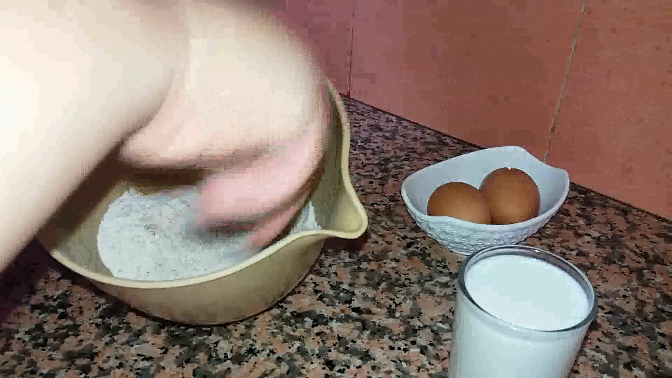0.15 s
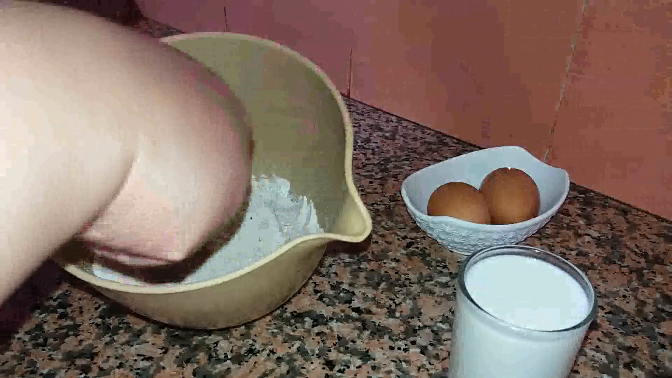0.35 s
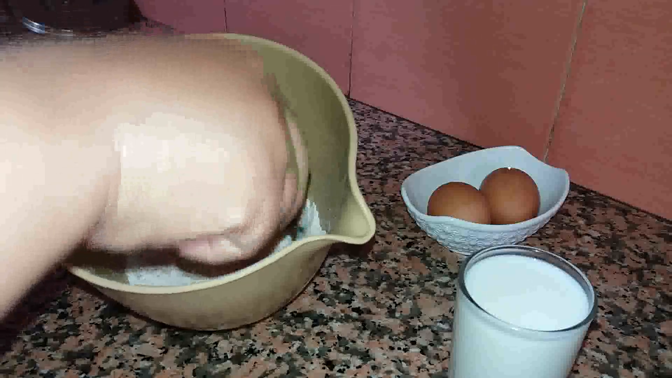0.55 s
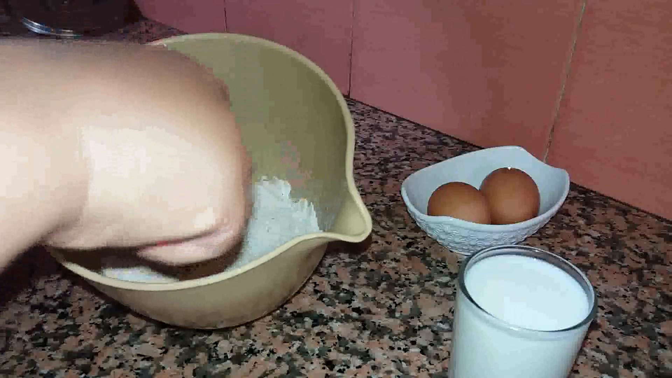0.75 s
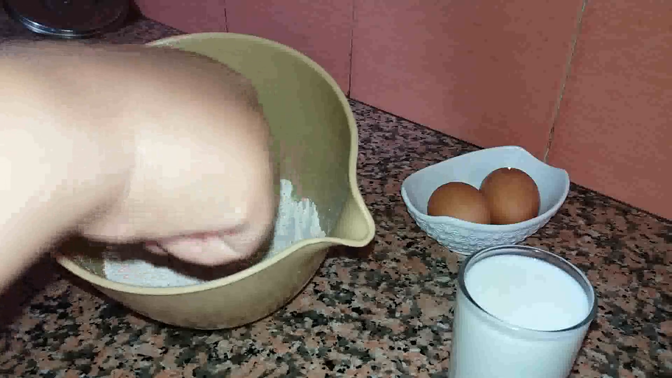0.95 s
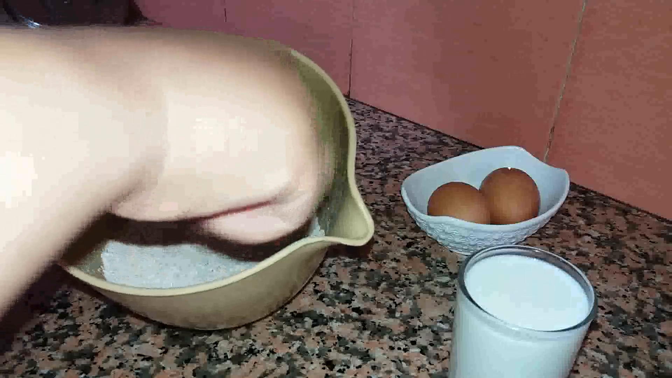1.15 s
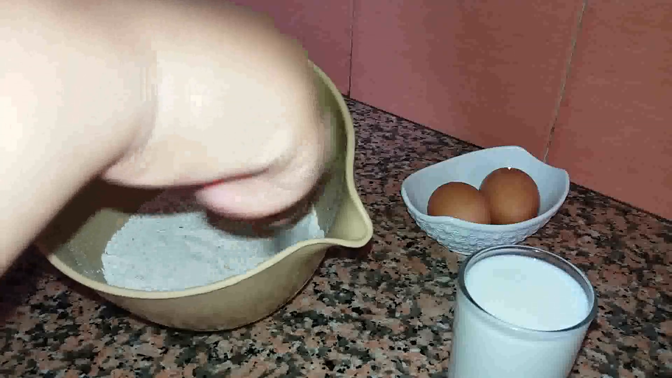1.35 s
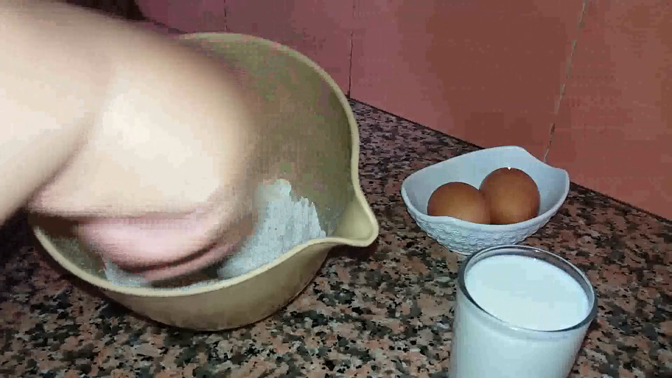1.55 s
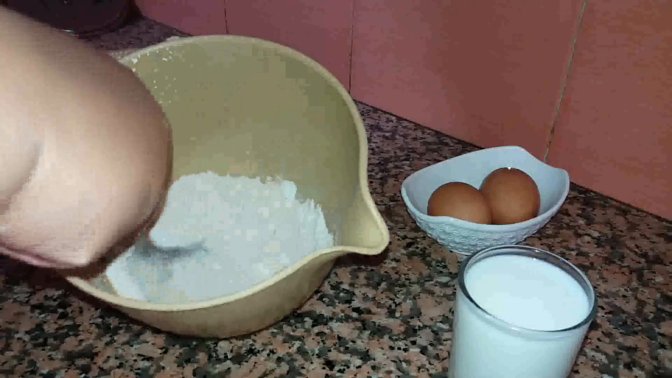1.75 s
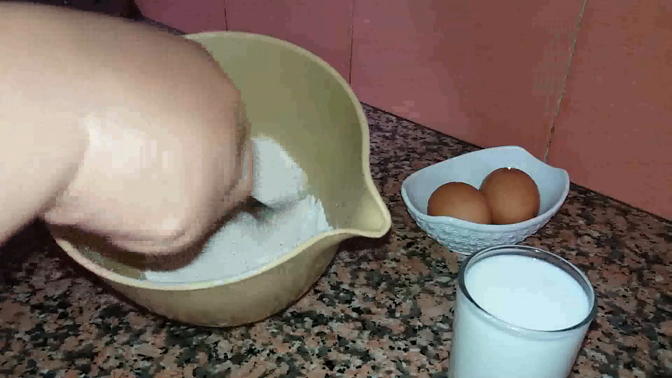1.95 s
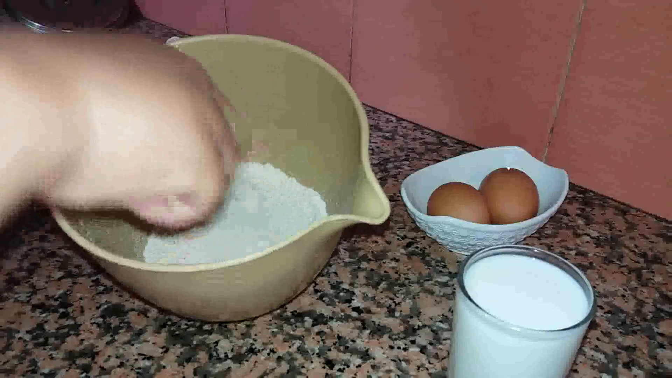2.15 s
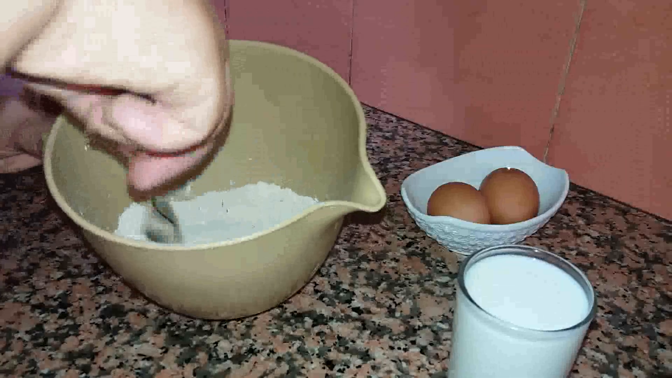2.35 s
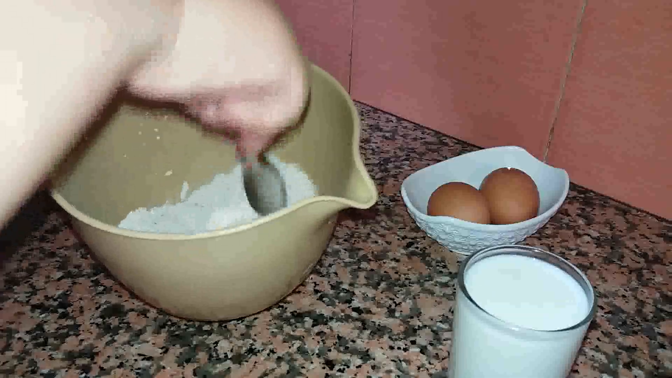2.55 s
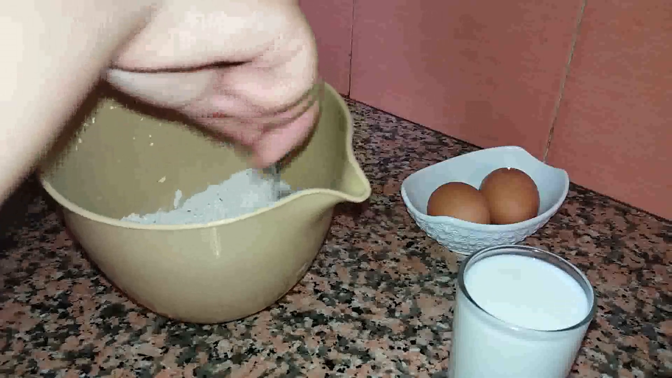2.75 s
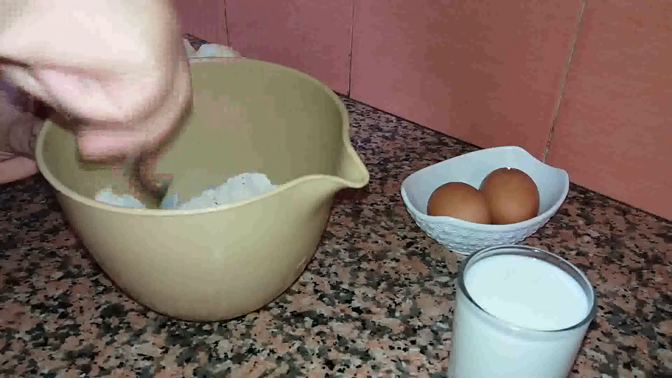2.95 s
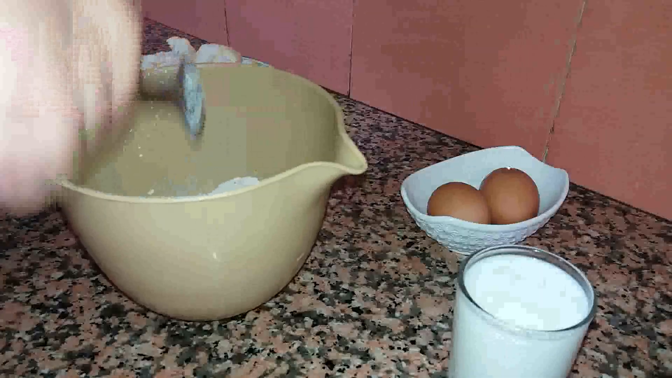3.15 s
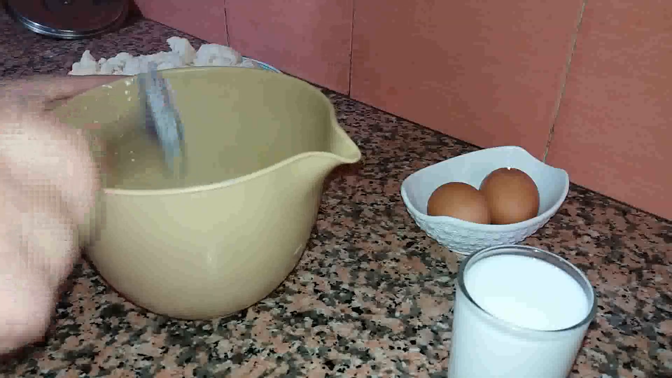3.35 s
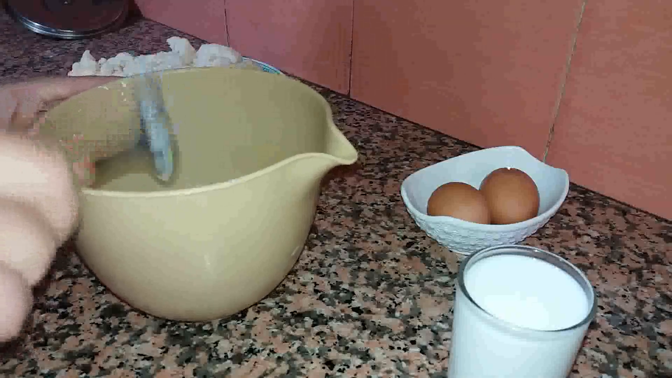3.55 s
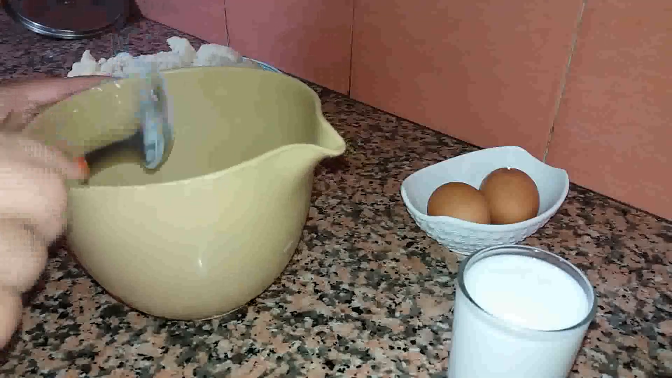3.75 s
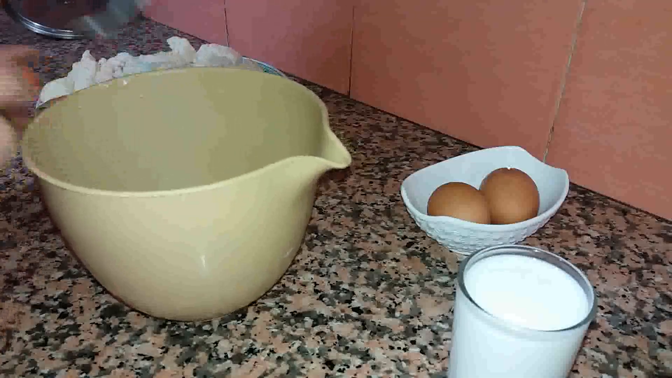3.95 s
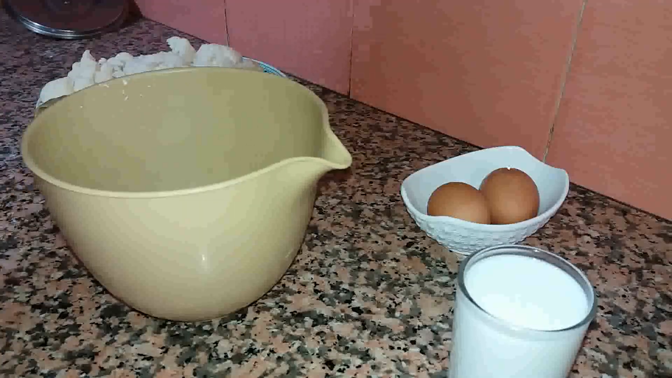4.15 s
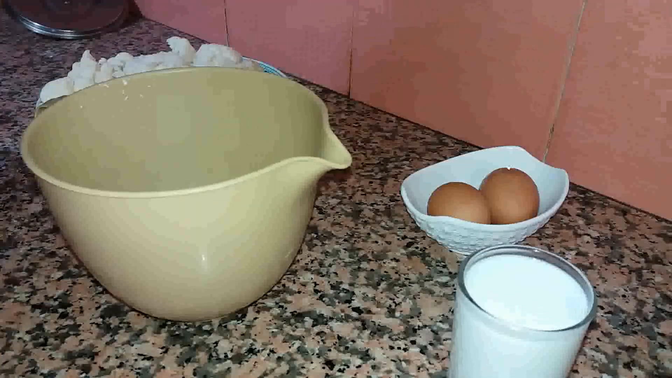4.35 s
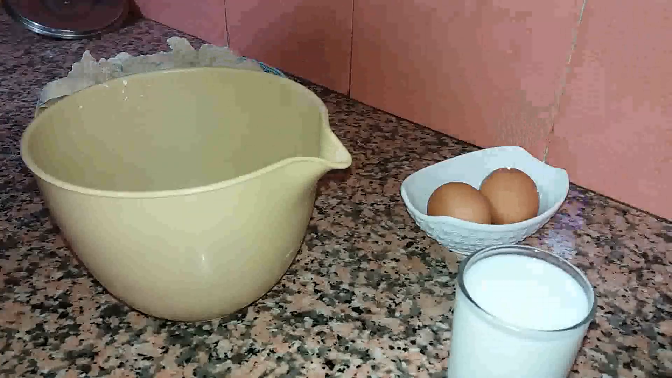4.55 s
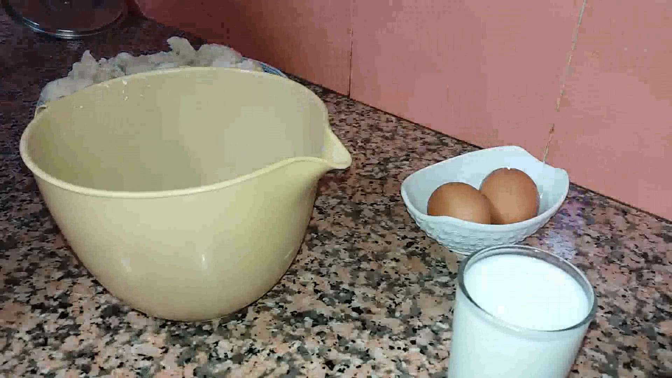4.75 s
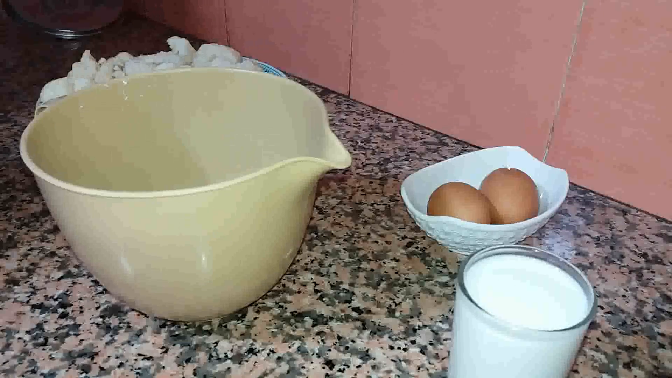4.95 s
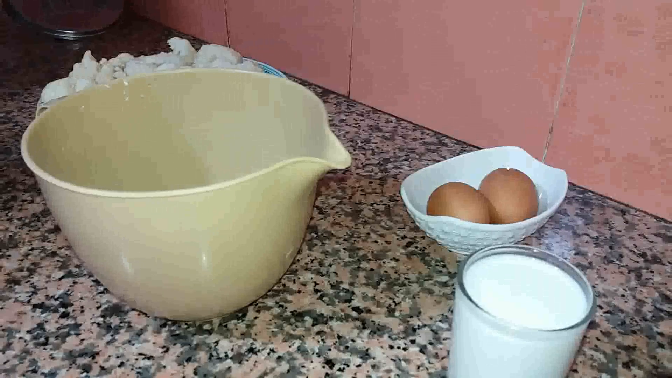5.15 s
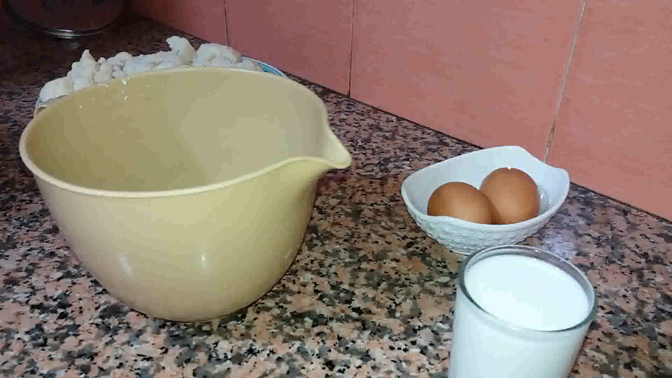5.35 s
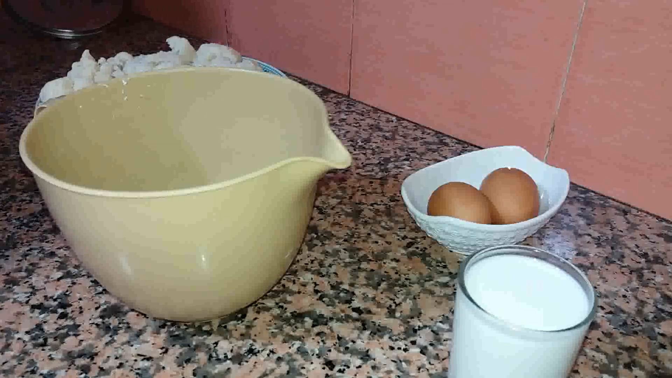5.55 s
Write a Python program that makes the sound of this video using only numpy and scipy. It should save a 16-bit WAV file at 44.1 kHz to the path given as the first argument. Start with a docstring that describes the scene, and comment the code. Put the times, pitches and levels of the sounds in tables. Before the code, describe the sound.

Quick irregular spoon strokes rasp softly through dry powder, mixed with short woody-sounding plastic knocks that grow stronger. The stirring stops and seven firm raps strike the bowl, hollow and quickly damped, with short hard kitchen reflections. Only a low wavering hum remains for almost a second before something nearby is handled with dull crackles and small taps. Close microphone, limited treble.

```python
"""Close to a tiled kitchen wall, a metal spoon stirs flour round a plastic bowl on a stone counter:
random slips are filtered into drag, weight and grit, among knocks that ring the bowl's decaying modes.
Then a run of seven knocks: raps on the rim, with the bowl rocking back onto its base.
Last come rustles nearby, made of filtered grains with light ticks and soft bumps.
Room air and a low, wavering hum, both filtered noise, lie under it all."""
import sys
import numpy as np
from scipy import signal
from scipy.fft import rfft, irfft
from scipy.io import wavfile
from scipy.ndimage import map_coordinates

SR = 44100
rng = np.random.default_rng(int(sys.argv[2]) if len(sys.argv) > 2 else 0)


def master(y):
    """Save y as 16-bit WAV."""
    cut = np.clip(np.atleast_2d(y).T, -1, 1)
    pcm = np.round(cut * 32767)  # scale
    wavfile.write(sys.argv[1], SR, pcm.astype(np.int16))


N = 250927
TIME = np.arange(N) / SR

# pushes of the spoon through the flour: (start [s], length [s], relative drag on the side [dB],
# relative weight on the floor [dB], relative powder grit [dB], grit swell over the push [dB], rasp pitch [Hz])
PUSHES = [(0, 0.054, -37, -43.5, -53, -1, 2085), (.256, 0.063, -39, -51.5, -62.5, -7, 1800),
          (.325, 0.096, -43.5, -51, -63, -1, 1800), (.415, 0.072, -39.5, -49.5, -55.5, 0.5, 2200),
          (.518, 0.086, -39, -50.5, -55.5, -2, 2235), (.595, 0.043, -36, -41.5, -62, 9, 1750),
          (.65, 0.052, -44.5, -50, -55.5, -8, 1980), (.84, 0.046, -47, -48, -67.5, 15, 1880),
          (.905, 0.051, -46, -40.5, -52.5, 0, 1766), (.95, 0.048, -49, -46, -58, -11, 1835),
          (1.16, .085, -48.5, -49, -57, 2, 1720), (1.402, 0.098, -47, -50.5, -59, 10, 2134),
          (1.68, 0.06, -42, -50.5, -63, 9, 1915), (1.79, 0.071, -46, -52.5, -62, 13, 2160),
          (1.852, .18, -36, -50, -57, -3, 2130), (2.06, 0.052, -41, -48, -57, 8, 1760),
          (2.288, 0.091, -44.5, -48, -66, 8.5, 1790), (2.412, 0.035, -38.5, -35.5, -56, 8, 1605),
          (2.65, 0.083, -36, -47.5, -58.5, 10, 1880), (2.966, 0.14, -40, -53, -56, 17.5, 2186),
          (3.14, 0.029, -39, -54, -50.5, -1, 2280)]


def undb(db):
    """Decibels to gain."""
    return 10 ** (np.asarray(db) / 20)


def unit(x):
    """Scale to rms 1."""
    return x / np.sqrt(np.mean(x ** 2))


def ring(x, response):
    """Pass a sound through an impulse response."""
    return signal.fftconvolve(x, response)[:N]


def ringdown(t, t60):
    """Exponential decay that falls by 60 dB in t60 seconds."""
    return np.exp(-np.log(1000) * t / t60)


def bump(centre, sigma):
    """Gaussian swell and fade round a moment, peak 1; both settings in seconds."""
    return np.exp(-.5 * ((TIME - centre) / sigma) ** 2)


def add(out, s, sound):
    """Mix a sound in at time s."""
    start = int(s * SR)
    out[start:start + len(sound)] += sound[:N - start]


def colour(x, points):
    """Shape a sound's spectrum by (frequency [Hz], relative level [dB]) points, at rms 1."""
    hz, db = np.transpose(points)
    bins = np.maximum(np.fft.rfftfreq(N, 1 / SR), 1)
    gain = undb(np.interp(np.log(bins), np.log(hz), db))
    return unit(irfft(rfft(x) * gain, N))


def resonate(x, hz, width_hz):
    """A steep resonance that follows a moving pitch: shift to 0 Hz, lowpass, shift back; rms 1."""
    turn = np.exp(2j * np.pi * np.cumsum(hz) / SR)
    band = signal.sosfilt(signal.butter(2, width_hz / 2, fs=SR, output="sos"), x / turn)
    return unit((band * turn).real)


def walk(rate):
    """Smooth random wandering with a spread near 1, through `rate` random knots a second."""
    knots = rng.standard_normal(1024)
    return map_coordinates(knots, [TIME * rate], order=3, mode="wrap")


def grains(rate, spread_db):
    """Tiny slips of either sign at random moments, `rate` a second, a few much larger than the rest."""
    chance, size = rng.random(N), rng.standard_normal(N)
    strength = undb(spread_db * np.clip(size, -2, 2))
    return (chance < rate / SR) * strength * rng.choice([-1, 1], N)


def gesture(start, rise, length, release, after_db, after_s):
    """Gain over time: a rise, a hold until length, a quick release and a faint, slow settling."""
    since = np.maximum(TIME - start - length, 0)
    fall = np.maximum(np.exp(-since / release), undb(after_db) * np.exp(-since / after_s))
    return np.clip((TIME - start) / rise, 0, 1) * fall


def background():
    """Room air and a low hum: two noises with their own spectra, the hum swelling and sinking."""
    # spectra of air and hum: (frequency [Hz], relative level [dB])
    air_spectrum = [(15, -75), (25, -47.5), (65, -23.5), (79, -8), (101, -12), (116, -13), (131, -22),
                    (217, -21.5), (283, -26.5), (436, -31), (480, -31), (740, -33.5), (2840, -49.5),
                    (7800, -52), (10100, -85), (17200, -120)]
    hum_spectrum = [(50, -53.5), (84, -14.5), (100, 9), (108, -7), (124, -26.5), (250, -63.5)]
    # course of the hum: (time [s], relative level [dB])
    hum_course = [(0, -52.5), (.5, -54), (1.2, -50.5), (1.8, -50), (2.3, -55.5), (4.2, -49.5), (4.4, -78),
                  (4.68, -43), (4.82, -60), (5.1, -52.5), (5.5, -54), (5.69, -81)]
    air = undb(-58) * colour(rng.standard_normal(N), air_spectrum)
    swell = undb(np.interp(TIME, *np.transpose(hum_course)))
    hum = colour(rng.standard_normal(N), hum_spectrum) * swell
    return air + undb(-5) * hum


def kitchen():
    """Direct sound, a few hard echoes, then a diffuse tail that dies at its own pace in each band."""
    # diffuse tail: (frequency [Hz], t60 [s], level [dB])
    tail_bands = [(110, 0.59, 2.5), (226, 0.29, -5.5), (650, 0.42, -12), (1400, 0.38, -10.5),
                  (2880, 0.56, -7), (6000, .25, -1)]
    # echoes from wall, counter and bowl: (delay [s], gain [ratio to direct sound])
    hard_echoes = [(0.0031, 0.26), (0.0068, 0.24), (0.01, 0.16), (0.0136, 0.29), (0.0188, 0.41)]
    t = TIME[:SR // 2]
    bins = np.log(np.maximum(np.fft.rfftfreq(len(t), 1 / SR), 1))
    noise = rfft(rng.standard_normal(len(t)))
    centres = np.log(np.array(tail_bands)[:, 0])
    response = np.zeros(len(t))
    for share, (hz, t60, db) in zip(np.eye(len(tail_bands)), tail_bands):
        # the tail gathers over some 14 ms before it dies away
        fade = ringdown(t, t60) * (1 - np.exp(-(t / .014) ** 2))
        # neighbouring bands cross-fade
        band = irfft(noise * np.interp(bins, centres, share), len(t))
        response += undb(db) * band * fade / np.linalg.norm(fade)
    response[0] += 1  # direct sound
    for s, gain in hard_echoes:
        response[int(s * SR)] += gain
    return response


def rustling():
    """Something is handled beside the bowl: creasing grains crackle dully, with sine ticks and bumps."""
    # rustles: (start [s], rise [s], decay time constant [s], relative body [dB], relative crackle [dB])
    squeezes = [(4.994, 0.0064, 0.023, -47, -52.5), (5.05, .01, 0.023, -56, -57.5),
                (5.221, 0.031, 0.047, -44.5, -46.5), (5.451, 0.0058, 0.052, -44, -53.5),
                (5.58, 0.0094, 0.016, -49.5, -48.5)]
    # light ticks: (time [s], level [dB], frequency [Hz], t60 [s])
    light_ticks = [(4.998, -60, 2960, 0.18), (4.998, -46.5, 932, 0.16), (5.244, -77, 3040, 0.2),
                   (5.459, -47.5, 865, 0.16), (5.591, -38.5, 704, 0.085), (5.591, -78.5, 4860, 0.15)]
    # soft bumps: (time [s], level [dB], frequency [Hz], spread sigma [s])
    soft_bumps = [(5.03, -42.5, 110, 0.0064), (5.105, -53, 98, 0.022), (5.39, -44.5, 139, 0.0075),
                  (5.42, -40.5, 142, 0.006)]
    # spectra of body and crackle: (frequency [Hz], relative level [dB])
    body_spectrum = [(300, -2), (550, 1.5), (700, 5.5), (810, 4), (930, 11), (1080, -27), (1300, -38)]
    crackle_spectrum = [(650, -25), (1100, 2), (1190, 2), (1620, 2.5), (1810, -2.5), (1970, 0.5),
                        (2700, -14), (2930, -11.5), (3850, -36), (4740, -36), (5370, -62), (7490, -37),
                        (8000, -52), (10400, -75), (17600, -120)]
    hold_s = 0.0072  # at full strength
    linger_db, linger_s = -14.5, 0.14  # the creases go on creeping after each rustle

    creases = grains(rate=1400, spread_db=6)
    body = undb(-7) * colour(creases, body_spectrum)
    crackle = undb(-5) * colour(creases, crackle_spectrum)
    out = np.zeros(N)
    for s, rise, decay, body_db, crackle_db in squeezes:
        squeeze = gesture(s, rise, rise + hold_s, decay, linger_db, linger_s)
        out += squeeze * (undb(body_db) * body + undb(crackle_db) * crackle)
    t = TIME[:SR // 4]
    for s, db, hz, t60 in light_ticks:
        add(out, s, undb(db) * np.sin(2 * np.pi * hz * t) * ringdown(t, t60))
    for s, db, hz, sigma in soft_bumps:
        out += undb(db) * np.sin(2 * np.pi * hz * (TIME - s)) * bump(s, sigma)
    return out


def lumps():
    """A lump gives way under the spoon in a brief bright crunch of dense grains."""
    # crushed lumps: (time [s], relative level [dB], spread sigma [s])
    crushes = [(0.47, -48, 0.0042), (0.559, -62.5, 0.05), (3.1, -54, 0.008), (3.158, -51, 0.012)]
    # spectrum of the crunch: (frequency [Hz], relative level [dB])
    crunch_spectrum = [(1500, -12), (2800, 12.5), (4200, 5), (5500, 1), (7800, -1)]
    pressure = sum(undb(db) * bump(s, sigma) for s, db, sigma in crushes)
    return undb(-3) * pressure * colour(grains(rate=5000, spread_db=3), crunch_spectrum)


def bowl():
    """Impulse responses of the low flexing, the body and the stiff wall, each a sum of modes at peak 1."""
    # the bowl's modes: (frequency [Hz], relative level [dB], longest t60 [s])
    modes = [(139.7, -15.5, .15), (233.7, -5.5, .15), (343.6, -4, 0.27), (400, -3, 0.35), (545, -7, 0.079),
             (616, 11.5, 0.03), (703, -10.5, 0.12), (734, -38.5, 0.15), (920, -16.5, 0.072),
             (1040, -9.5, 0.029), (1143, -5, 0.027), (1264, -21, 0.22), (1453, -7, 0.17),
             (1567, -17, 0.068), (1710, -29.5, 0.054), (1880, -18, 0.14), (1980, -23, 0.025),
             (2263, -19, 0.064), (2510, -26.5, 0.027), (2760, -21.5, 0.057), (3160, -24, 0.024),
             (3995, -35.5, 0.033)]
    t = TIME[:SR // 4]
    parts = np.zeros((3, len(t)))
    for k, (hz, db, longest_t60) in enumerate(modes):
        family = int(hz > 450) + int(hz > 900)  # 0 flexing, 1 body, 2 wall
        # plastic is lossy, more so in the treble
        t60 = min(longest_t60, .11 * (300 / hz) ** .35)
        # neighbouring wall modes push the air in opposite ways
        sign = (-1) ** k if family == 2 else 1
        parts[family] += sign * undb(db) * np.sin(2 * np.pi * hz * t) * ringdown(t, t60)
    return normalise_peaks(parts)


def normalise_peaks(parts):
    """Scale each row to peak 1."""
    return parts / np.abs(parts).max(axis=1, keepdims=True)


def pitches():
    """The drag sinks in pitch during each push; the rasp has one pitch for each push."""
    middle_hz, sag_hz = 654.4, 70  # the drag in mid push, and its fall from start to end
    drag_hz = np.full(N, middle_hz)
    rasp_hz = np.full(N, float(PUSHES[0][-1]))
    for start, length, *_, hz in PUSHES:
        first = max(int(start * SR), 0)
        travel = np.minimum((TIME[first:] - start) / length, 1) - .5
        drag_hz[first:] = middle_hz - sag_hz * travel
        rasp_hz[first:] = hz
    return drag_hz, rasp_hz


def effort():
    """Gains of drag, weight and grit; a swell tilts the grit as flour heaps up before the spoon."""
    attack_s, release_s = 0.0057, 0.019  # the spoon bites into the flour; time constant of letting go
    settle_s = 0.14  # time constant with which bowl and flour come to rest after a push
    drag_settle_db, weight_settle_db, grit_settle_db = -25.5, -17.5, -13  # relative to the push

    drag, weight, grit = np.zeros((3, N))
    for start, length, drag_db, weight_db, grit_db, swell_db, _ in PUSHES:
        shape = (start, attack_s, length, release_s)
        travel = np.clip((TIME - start) / length, 0, 1) - .5
        heaped_db = grit_db + swell_db * travel
        drag = np.maximum(drag, undb(drag_db) * gesture(*shape, drag_settle_db, settle_s))
        weight = np.maximum(weight, undb(weight_db) * gesture(*shape, weight_settle_db, settle_s))
        grit = np.maximum(grit, undb(heaped_db) * gesture(*shape, grit_settle_db, settle_s))
    return drag, weight, grit


def stirring(wall):
    """The spoon sticks and slips through the flour: slips shake the bowl, packed powder rasps."""
    # spectra of drag on the side, weight on the floor and grit: (frequency [Hz], relative level [dB])
    drag_spectrum = [(350, -18.5), (510, -13.5), (590, 7), (640, 4), (740, 0), (830, -9), (1000, -23.5),
                     (1500, -44)]
    weight_spectrum = [(100, -13), (160, -7.5), (215, 3), (280, -8.5), (345, -5), (420, -7.5), (500, -31.5),
                       (800, -53)]
    grit_spectrum = [(530, -48), (900, -30.5), (1010, 5.5), (1330, 0.5), (1530, 8), (2090, -2.5), (2310, 3),
                     (3120, 1), (3640, -13.5), (4030, -6), (4880, -34), (7440, -17.5), (8000, -43.5),
                     (10400, -58), (17600, -120)]

    unevenness = undb(2.2 * walk(60))
    slips = grains(rate=900, spread_db=4) * unevenness
    clumps = undb(1.5 * walk(150))
    powder = grains(rate=2100, spread_db=2.5) * unevenness * clumps
    # the pitch of drag and rasp shifts as the contact travels round the bowl
    drag_hz, rasp_hz = pitches()
    # a shift by one second keeps layers from the same grains apart
    drag = undb(-7) * colour(slips, drag_spectrum)
    drag += undb(-7) * resonate(np.roll(slips, SR), drag_hz, width_hz=145)
    weight = colour(slips, weight_spectrum)
    grit = undb(-4) * resonate(powder, rasp_hz, width_hz=640)
    grit += undb(-3) * colour(np.roll(powder, SR), grit_spectrum)
    grit += undb(-13) * unit(ring(slips, wall))
    drag_gain, weight_gain, grit_gain = effort()
    return drag * drag_gain + weight * weight_gain + grit * grit_gain


def knocks(flex, body, wall):
    """Each blow rings the bowl; hard metal contact wakes the wall modes and adds a short crack."""
    # knocks of spoon and bowl: (time [s], relative body level [dB], then relative to the body:
    # low flexing [dB], wall ring and crack [dB], clap of the base [dB])
    blows = [(0.261, -33, -5, -16, -15), (0.418, -44.5, -3, -14, -9), (0.52, -35, -5, -25, -9),
             (0.63, -34.5, -17.5, -21.5, -7), (0.84, -46.5, -5, -34, -16), (0.9, -21, -17.5, -33, -19),
             (1.405, -33.5, -19.5, -28, -12), (1.672, -22.5, -11, -17.5, 1), (1.855, -33.5, -15, -21, -19),
             (1.959, -24.5, -14, -27.5, -28), (2.015, -31.5, -13, -17, 2), (2.29, -41, -17, -19.5, -18),
             (2.4, -20, -16, -32.5, -20), (2.63, -14.5, -12, -28.5, -31), (2.715, -28, -10.5, -32, -16),
             (2.972, -69, -14, -30, -13), (3.506, -24.5, -7, -12, -9), (3.579, -19.5, -10, -31.5, -27),
             (3.652, -7.5, -9, -14.5, -9), (3.737, -8.5, -20.5, -33.5, -18.5),
             (3.843, -10.5, -10, -14, -11), (4.036, -9, -10, -11.5, -11.5), (4.102, -5.5, -14.5, -29.5, -8)]
    # spectra of metal cracking on plastic and of first contact: (frequency [Hz], relative level [dB])
    crack_spectrum = [(500, -20.5), (1000, 10.5), (2600, 7.5), (3500, -13.5), (4200, -19), (5200, -47),
                      (7800, -33.5)]
    snap_spectrum = [(700, -12.5), (1600, -4.5), (3100, -4.5), (4400, -12), (7800, -20)]

    out, t = np.zeros(N), TIME[:len(body)]
    crack_noise = colour(rng.standard_normal(N), crack_spectrum)
    snap_noise = colour(rng.standard_normal(N), snap_spectrum)
    # the counter booms faintly under the bowl
    boom = undb(-18.5) * np.sin(2 * np.pi * 104 * t) * ringdown(t, 0.18)
    # the base slaps the stone with a short, higher note
    clap = np.sin(2 * np.pi * 735 * t) * ringdown(t, 0.022)
    for s, db, flex_db, wall_db, clap_db in blows:
        # each blow takes its own stretch of noise
        shift = int(s * SR)
        crack = np.roll(crack_noise, shift)[:len(t)] * np.exp(-t / 0.0034)
        blow = body + undb(clap_db) * clap + undb(flex_db + 3.5) * (flex + boom)
        blow += undb(wall_db) * (undb(0.5) * wall + undb(-1) * crack)
        # first contact gives a tiny snap, even on a dull blow
        snap = np.roll(snap_noise, shift)[:len(t)] * np.exp(-t / 0.0016)
        add(out, s - .001, undb(db - 39) * snap)
        # the plastic yields for a moment before the ring is at full strength
        add(out, s - .0005, undb(db + 5) * blow * (1 - np.exp(-t / 0.0029)))
    # so small a bowl radiates no deep bass
    return signal.sosfilt(signal.butter(2, 110, "highpass", fs=SR, output="sos"), out)


def scene():
    """All on the counter sounds through one kitchen; stirring deep in the bowl reaches it least."""
    flex, body, wall = bowl()
    room = kitchen()
    inside = stirring(wall) + lumps()
    outside = knocks(flex, body, wall) + rustling()
    in_room = ring(outside + undb(-8.5) * inside, room)
    # the stirring also reaches the microphone without the room
    return (undb(-6.5) * inside + in_room + background())[None]


def record(dry):
    """The microphone sheds the deep bass and the recorder cuts the top steeply."""
    thinned = signal.sosfilt(signal.butter(2, 45, "highpass", fs=SR, output="sos"), dry)
    return signal.sosfilt(signal.ellip(12, .2, 70, 7740, fs=SR, output="sos"), thinned)


dry = scene()
out = record(dry)
master(out)
```